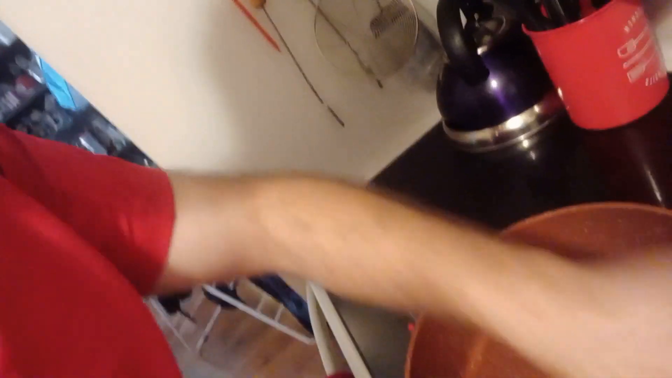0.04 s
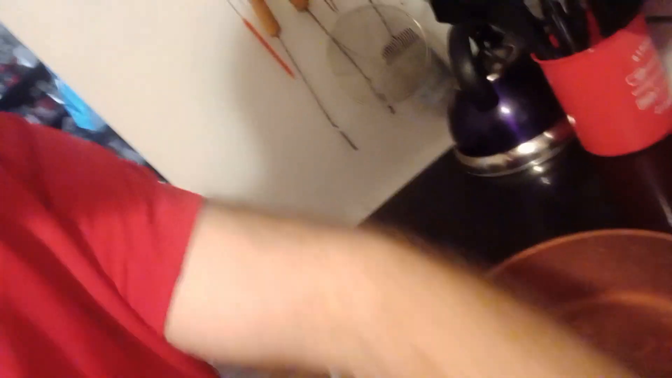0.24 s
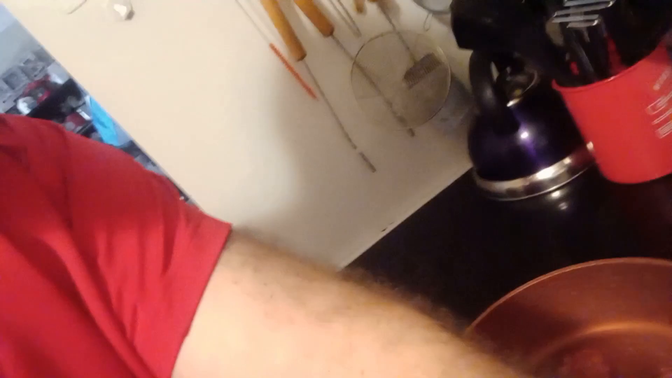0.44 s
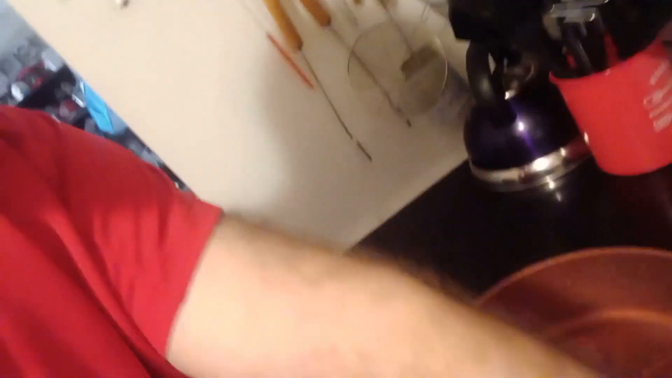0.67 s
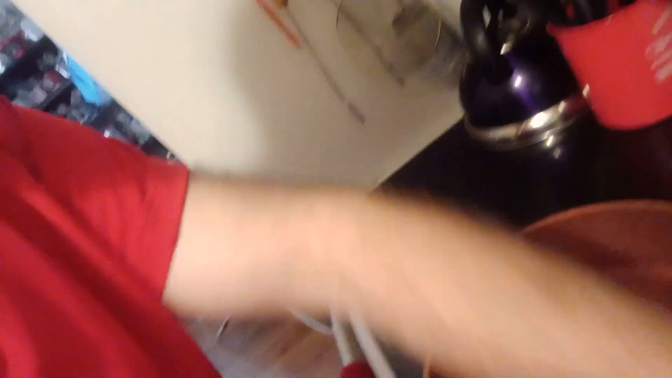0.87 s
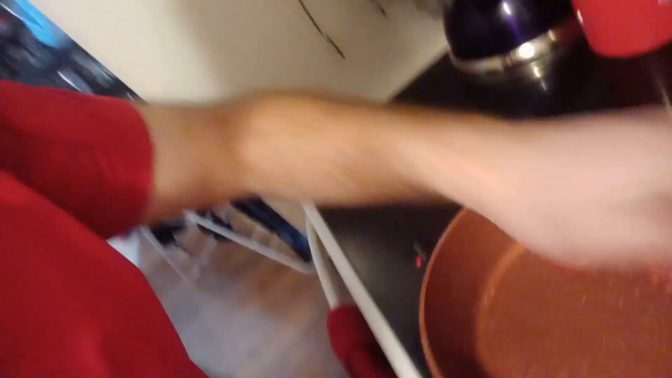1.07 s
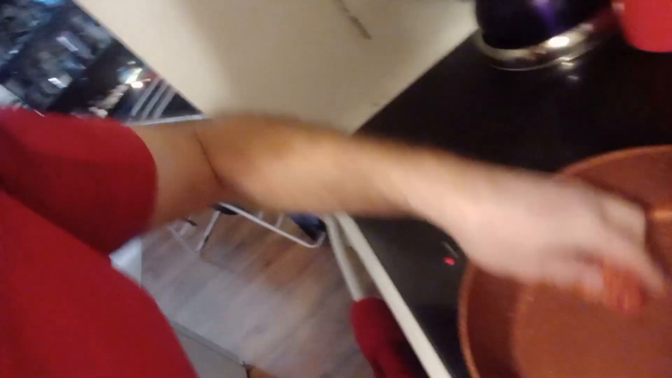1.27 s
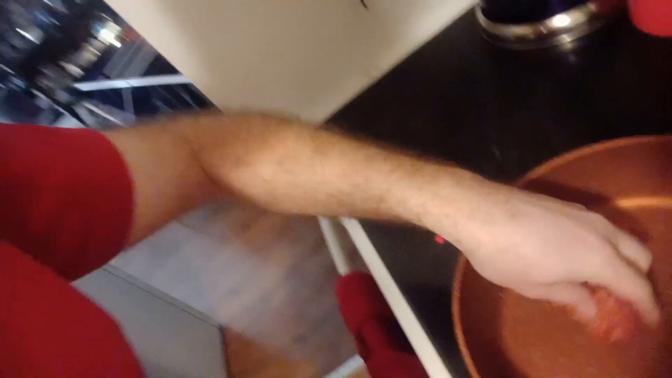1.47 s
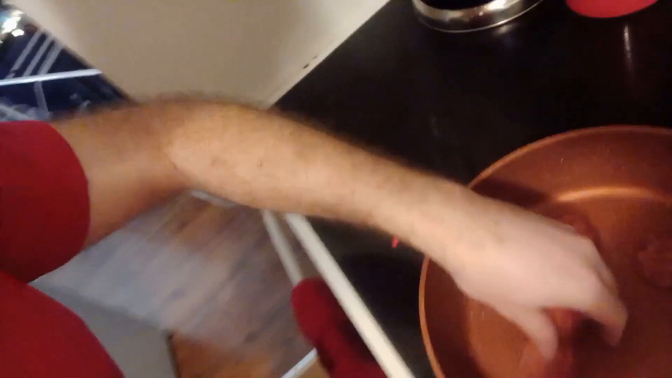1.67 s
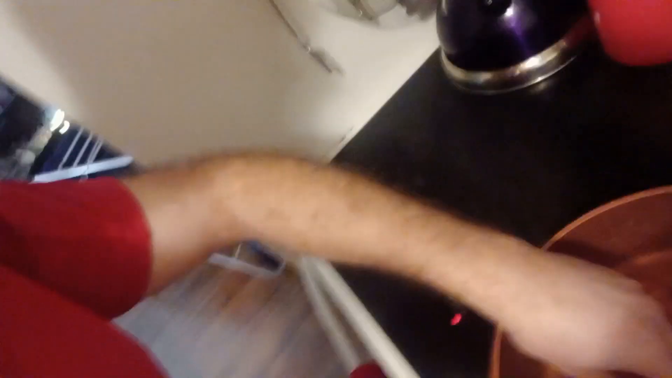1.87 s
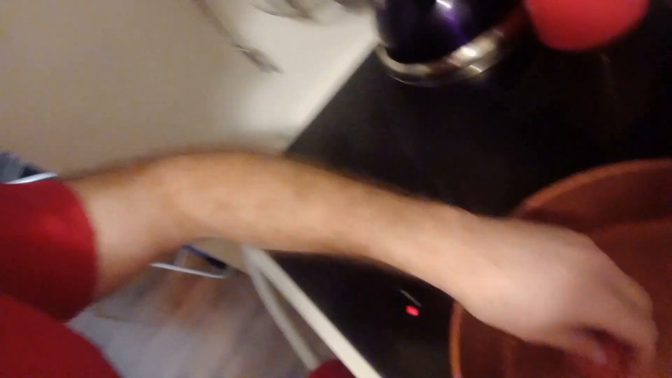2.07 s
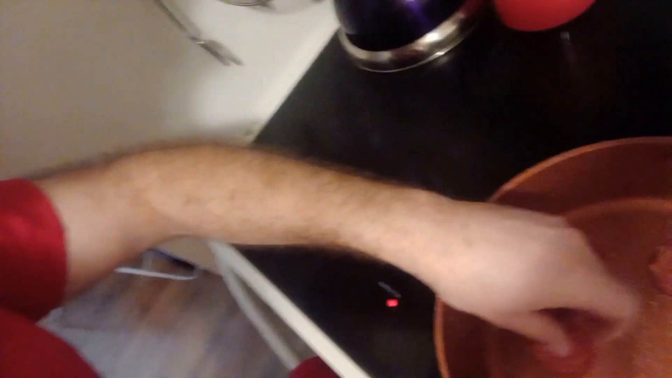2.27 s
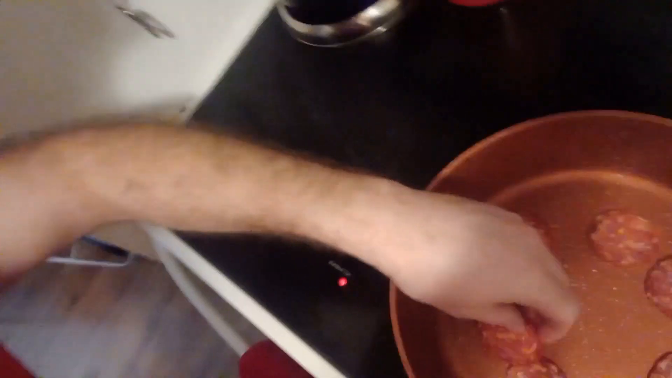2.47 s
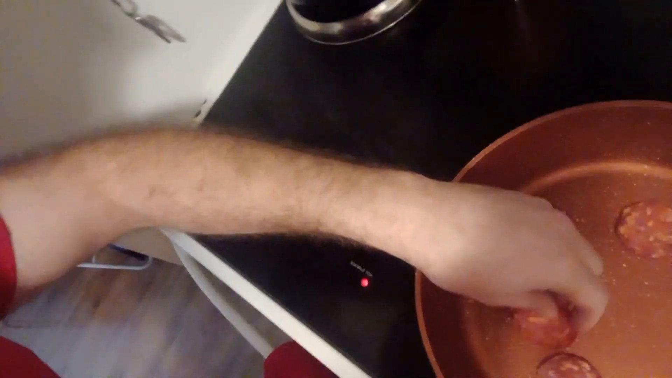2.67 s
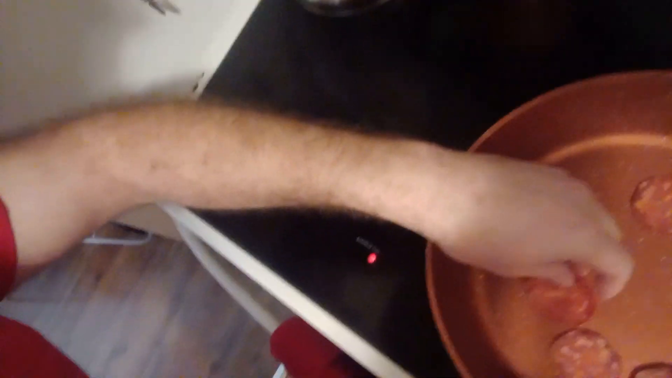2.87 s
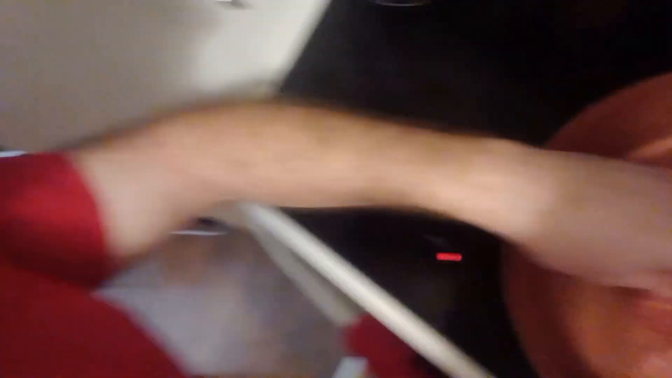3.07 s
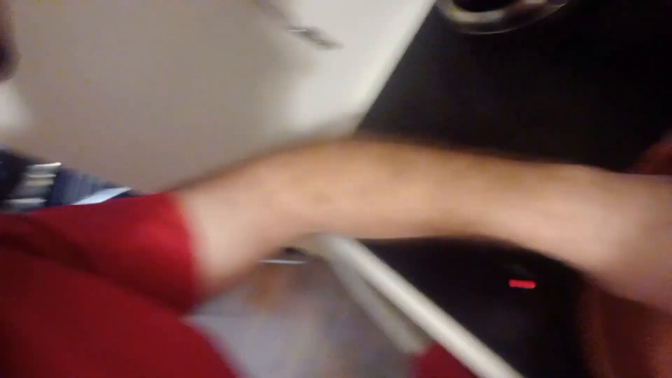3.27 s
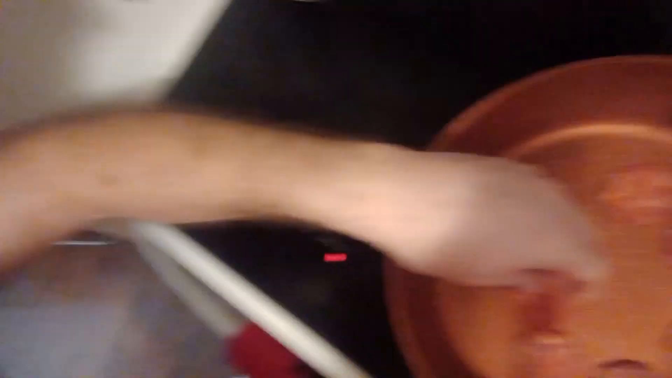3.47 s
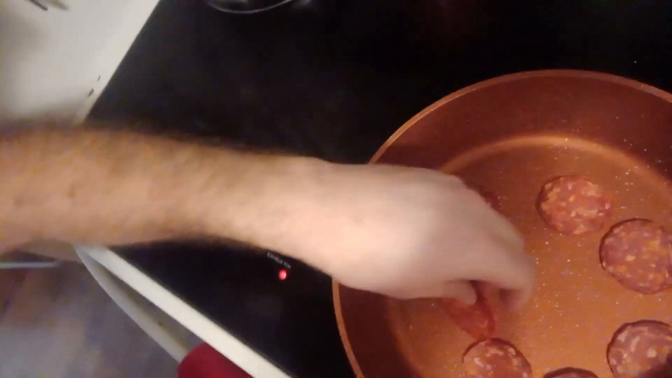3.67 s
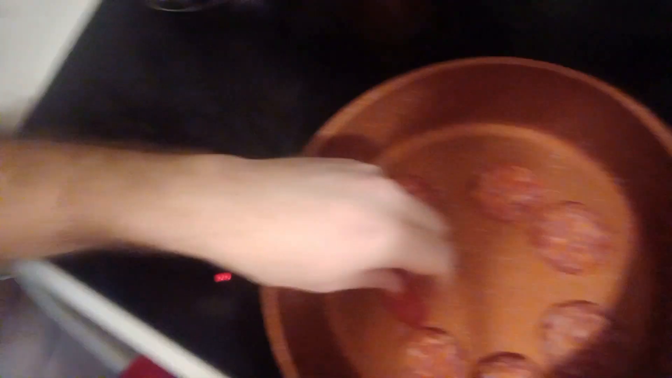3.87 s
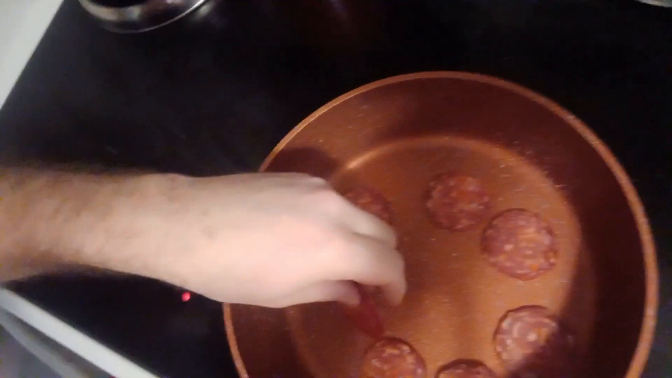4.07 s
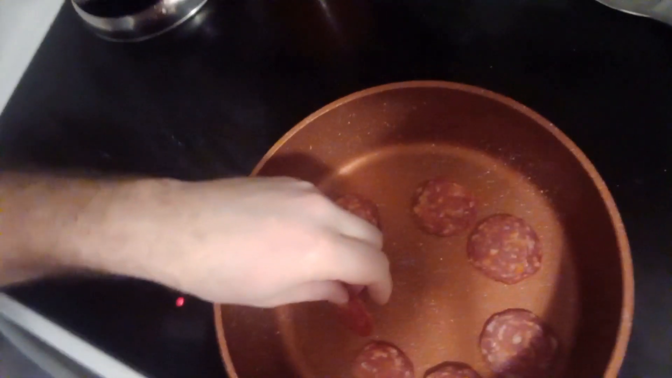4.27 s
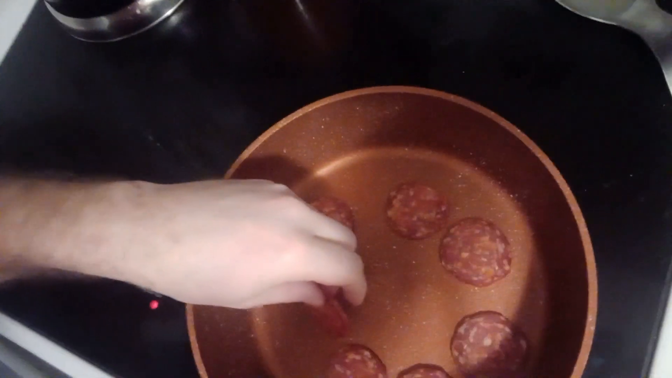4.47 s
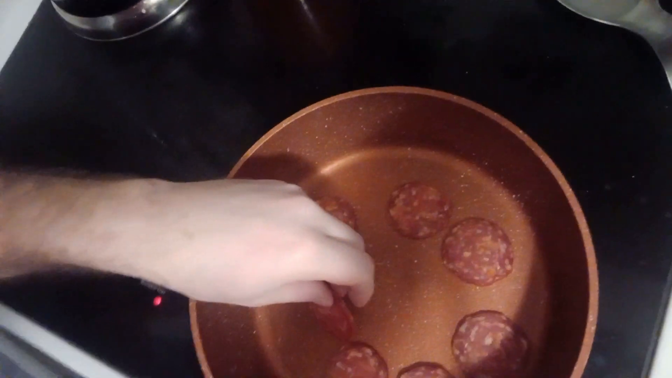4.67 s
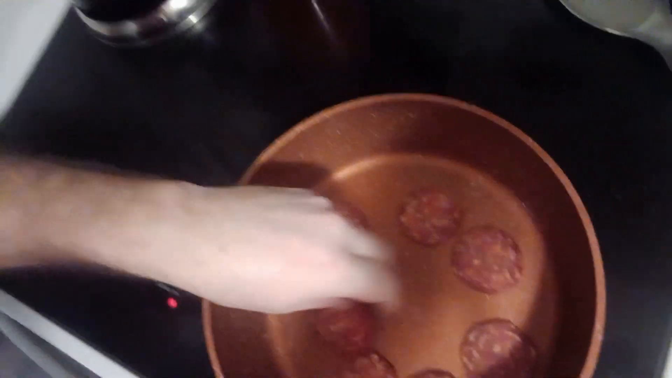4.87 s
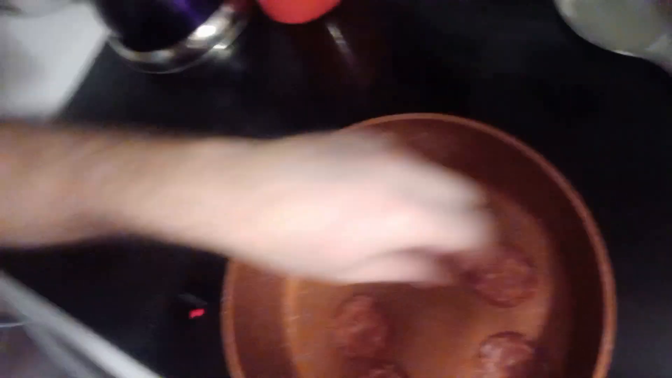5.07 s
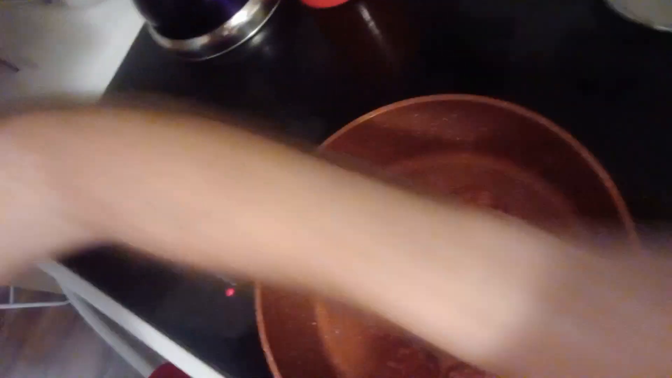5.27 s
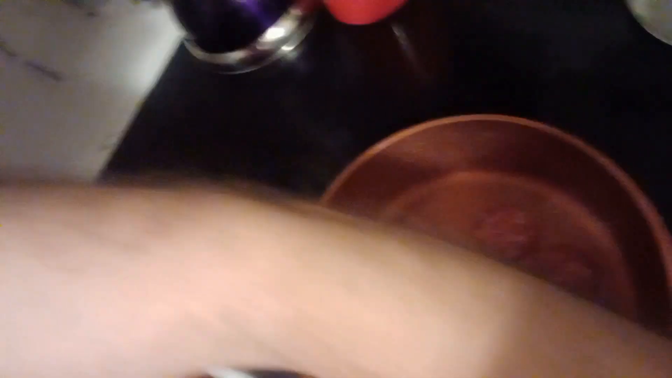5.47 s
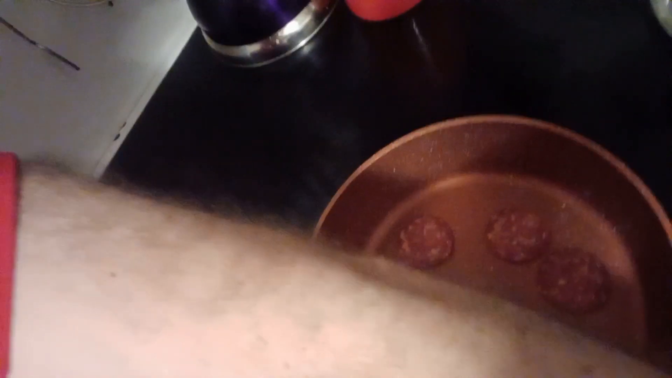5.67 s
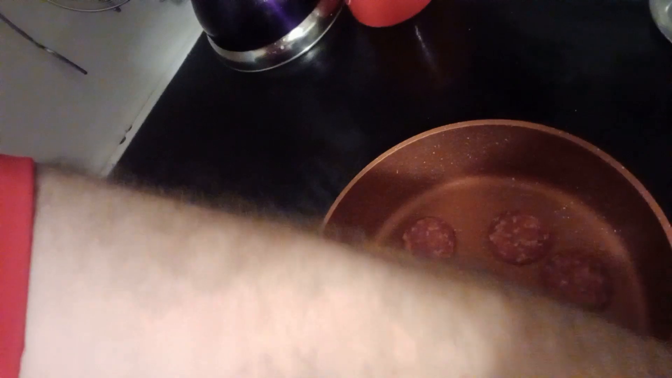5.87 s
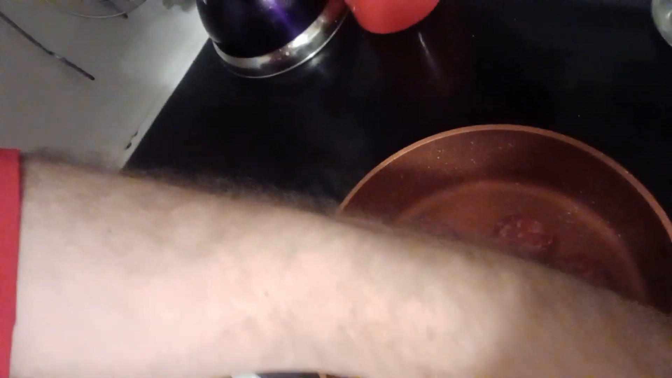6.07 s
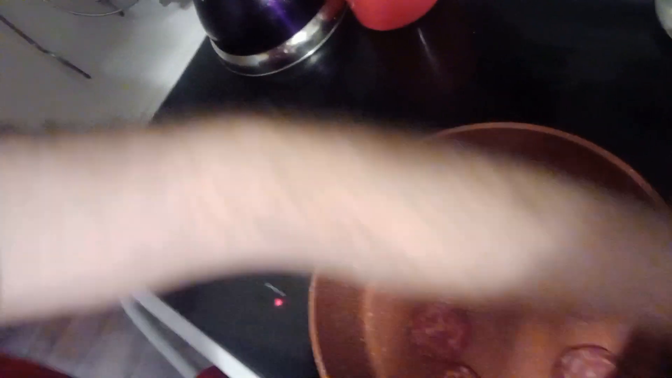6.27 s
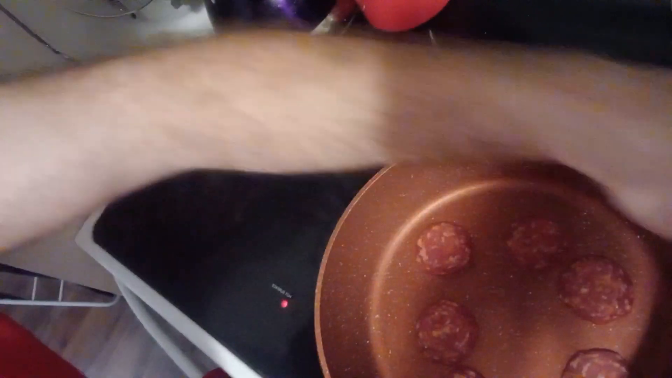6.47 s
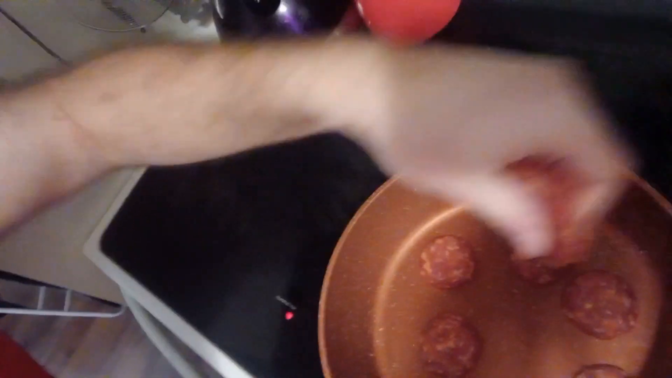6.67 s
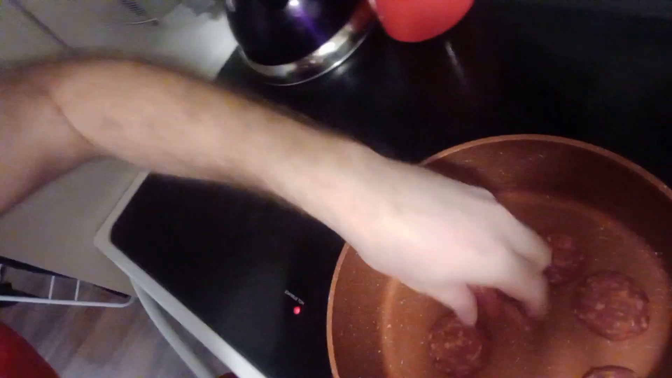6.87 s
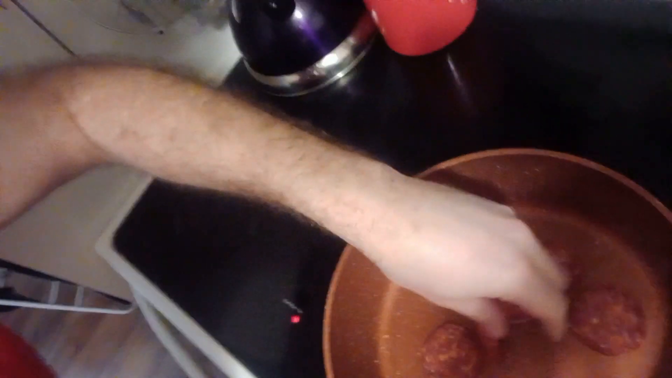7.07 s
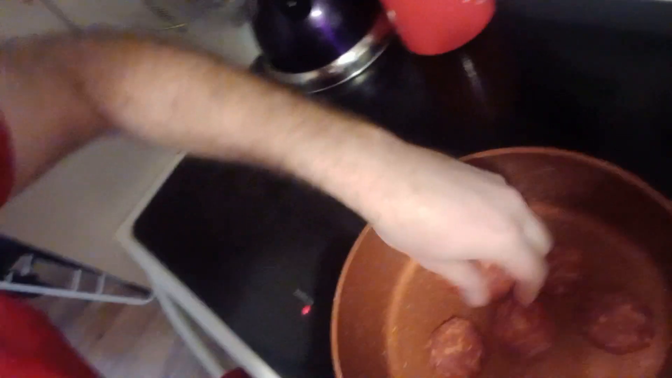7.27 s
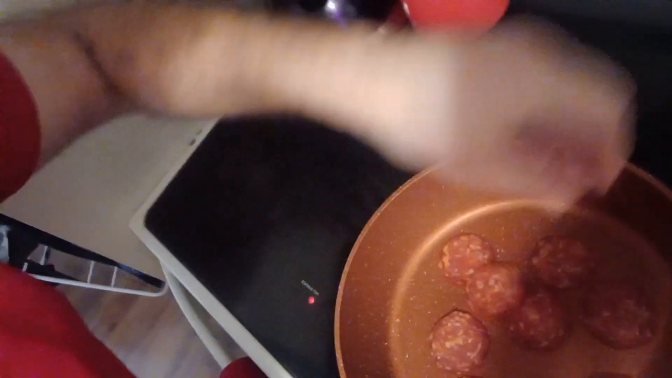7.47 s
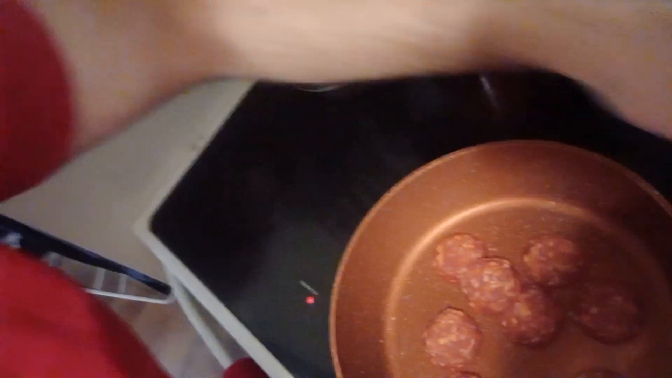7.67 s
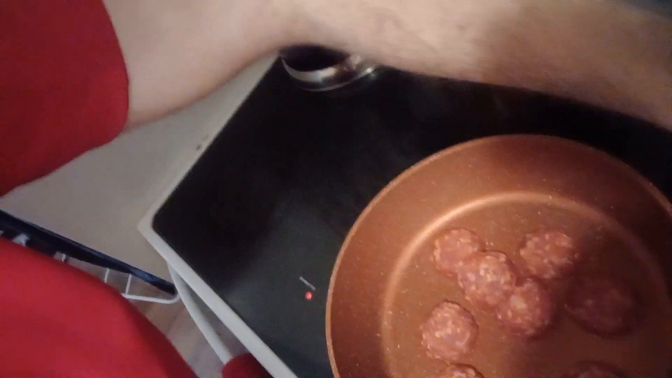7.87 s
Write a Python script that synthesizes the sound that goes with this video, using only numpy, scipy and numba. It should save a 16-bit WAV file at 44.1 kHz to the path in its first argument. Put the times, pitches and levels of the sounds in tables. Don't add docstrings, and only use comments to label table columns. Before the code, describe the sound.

Cured meat slices laid into a hot pan; a thin crackling sizzle steadily thickens with sharp spits and soft knocks over a low fridge hum.

```python
import sys
import numpy as np
from scipy import signal
from scipy.fft import rfft, irfft
from scipy.io import wavfile
from scipy.ndimage import uniform_filter1d
from numba import njit

SR = 44100
rng = np.random.default_rng(int(sys.argv[2]) if len(sys.argv) > 2 else 0)


def decibels_to_gain(level_db):
    exponent = np.asarray(level_db, float) / 20
    return 10 ** exponent


def pcm_store(signal):
    levels = np.round(np.clip(np.atleast_2d(signal), -1, 1) * 32767)
    wavfile.write(sys.argv[1], SR, levels.astype(np.int16).T)


N = 349713
TIME = np.arange(N) / SR
HZ = np.fft.rfftfreq(N, 1 / SR)


def level(x, db):
    return x * decibels_to_gain(db) / np.sqrt(np.mean(x ** 2))


def curve(table):
    s, *columns = np.transpose(table)
    return [np.interp(TIME, s, column) for column in columns]


def colour(x, points):
    hz, db = np.transpose(points)
    gain = decibels_to_gain(np.interp(np.log(HZ + 1), np.log(hz), db))
    return irfft(rfft(x) * gain, N)


def band(x, lo_hz, hi_hz):
    return signal.sosfilt(signal.butter(3, [lo_hz, hi_hz], "band", fs=SR, output="sos"), x)


def walk(rate):
    hold = int(SR / rate)
    held = np.repeat(rng.standard_normal(N // hold + 1), hold)
    return 0.478 * uniform_filter1d(uniform_filter1d(held, hold), hold)[:N]


def echoes(x, t60, db):
    t = np.arange(SR // 4) / SR
    mid, side = rng.standard_normal((2, len(t))) * decibels_to_gain(-60 * t / t60) * (t > .0008)
    side = signal.sosfilt(signal.butter(2, 300, "high", fs=SR, output="sos"), side)
    tail = np.array([mid + side, mid - side])
    tail = tail * decibels_to_gain(db) / np.sqrt(np.sum(tail ** 2, axis=1, keepdims=True))
    return x + signal.oaconvolve(x, tail, axes=1)[:, :N]


def ears(pan_db):
    return decibels_to_gain(np.array([pan_db, -pan_db]) / 2)


@njit
def rings(start, hz, t60, size, length):
    out = np.zeros(length)
    for k in range(len(start)):
        turn = np.exp(2j * np.pi * hz[k] / SR - np.log(1000) / (t60[k] * SR))
        z = size[k] + 0j
        for i in range(start[k], min(length, start[k] + int(t60[k] * SR))):
            out[i] += z.imag
            z *= turn
    return out


def at_ears(s, hz, t60, size, pan_db, lag_s):
    heard = []
    for side, gain in zip((1, -1), ears(pan_db)):
        start = np.clip((s + side * lag_s / 2) * SR, 0, N).astype(np.int64)
        heard.append(rings(start, hz, t60, size * gain, N))
    return np.array(heard)


def bursts(s, hz, t60, size, pan_db, lag_s, tail_s, tail_db, count):
    rows = np.broadcast_arrays(s, hz, t60, size, pan_db, lag_s)
    places = [[1. * row[k::count] for row in rows] for k in range(count)]
    return sum(echoes(at_ears(*place), tail_s, tail_db) for place in places)


WALLS_S = 0.057

# pitch_hz [Hz], level_db [dB]
LEFT_EAR = [(1200, -33.5), (1900, -25), (2600, -35.5), (2900, -16.5), (4600, -11.5), (6200, -9),
            (8000, -7.5), (9000, -10), (9800, -32), (11000, -3.5), (13000, 2.5), (14700, 6.5),
            (15750, 10.5), (16000, -59)]
RIGHT_EAR = [(1200, -37.5), (1900, -32), (2600, -29.5), (2900, -23.5), (5000, -16), (6700, -10),
             (7300, -11.5), (8400, -23), (9400, -15), (10500, -7), (12000, -1), (13500, 5), (15750, -5),
             (16000, -55)]


def microphones(x):
    x = np.array([colour(x[0], LEFT_EAR), colour(x[1], RIGHT_EAR)])
    low = irfft(rfft(x) / (1 + (HZ / 9000) ** 12), N)
    return x - low, low


# start_s [s], fizz_db [dB], left_minus_right_db [dB]
FRYING = [(0.0, -54, -7), (0.26, -52.5, -9.5), (0.5, -47.5, -8), (1.04, -46.5, -10.5), (1.17, -40.5, -7.5),
          (1.45, -39.5, -8.5), (1.7, -38, -9), (2.25, -36, -10), (2.65, -36, -8), (2.98, -35, -10),
          (3.35, -33, -10), (3.7, -35, -7), (4.37, -35.5, -4.5), (5.15, -33.5, -5.5), (5.32, -36.5, -4.5),
          (5.6, -34.5, -6), (6.87, -33.5, -6), (7.93, -32.5, -6)]


def sizzle():
    when, pitch, strength, place, delay = rng.random((40000, 5)).T
    s = when * N / SR
    hz = 1500 + 18000 * pitch
    flurry_db = 4 * walk(12) + 4.8 * walk(90)
    bubble_db = np.minimum(-4.0 * np.log(strength), 17)
    size = decibels_to_gain(bubble_db + flurry_db[(s * SR).astype(int)]) * np.sqrt(hz)
    lag_s = .0002 + .0006 * (delay - .5)
    bubbles = bursts(s, hz, 5.6 / hz, size, 8 * (place - .5), lag_s, WALLS_S, -2.5, count=6)
    finest = rng.standard_normal((2, N)) * decibels_to_gain(0.059 * flurry_db)
    fizz_db, pan_db = curve(FRYING)
    hiss_db = -10.5 + 0.56 * (pan_db - pan_db.mean()) + 0.04 * (fizz_db - fizz_db.mean())
    bright, low = microphones(level(bubbles, 0) + level(finest, 0.74))
    fizz = level(bright, 0.25) + level(low, 0.15) * decibels_to_gain(hiss_db)
    return ears(pan_db) * decibels_to_gain(fizz_db) * fizz


# start_s [s], peak_db [dB], lower_hiss_db [dB], left_minus_right_db [dB]
SPITS = [(0.6335, -24, -0.5, -10), (0.7314, -29, 3, -12), (0.7622, -27, -28, -10), (0.908, -26, -33, -10),
         (1.4555, -21, -5, -14), (1.4948, -20, 0, -6), (1.6505, -25, -25, -9), (2.04, -19.5, 0, -9),
         (2.324, -13.5, -13, -8), (2.4453, -16, -22, -6.5), (2.6275, -16.5, -28, -18),
         (2.803, -17, -4, -13), (3.2894, -17, 2, -15), (3.511, -17, -16, -12), (3.8312, -20, -12, -12),
         (4.0732, -15.5, -11, -19), (4.2442, -13, -21, -2.5), (4.4206, -18, -3, -4), (5.033, -15, -23, -6),
         (5.3742, -14.5, -25, -3), (5.4944, -21, -28, -5), (5.6401, -19, -31, -11), (6.355, -5, -32, -9),
         (6.5585, -9.5, -8, -2), (6.7713, -9, -27, -6), (6.8507, -9.5, -22, -5), (7.167, -9.5, -22, 3),
         (7.47, -8, -28, -2.0), (7.634, -13.5, -28, -5), (7.6926, -12, -20, -5)]
# start_s [s], peak_db [dB]
SPATTER = [(0.0014, -26.5), (0.1428, -26), (0.1635, -34), (0.1869, -30), (0.3994, -30), (0.4154, -33),
           (0.427, -31), (0.6401, -30), (0.7266, -28), (0.9131, -27), (0.9518, -34), (1.3301, -29),
           (1.3902, -28), (1.3981, -25), (1.9669, -18), (2.3893, -25), (2.4835, -20), (2.6886, -16),
           (2.7056, -17), (2.8141, -13), (2.9971, -18), (3.1196, -16), (3.1378, -22), (3.373, -9),
           (3.425, -23), (3.4919, -19), (3.5698, -16), (3.6083, -21), (3.7619, -17), (3.8415, -16),
           (3.9233, -19), (4.0285, -24), (4.2671, -15), (4.3381, -20), (4.3646, -19), (4.4302, -18),
           (4.4433, -23), (5.0688, -12), (5.3344, -20), (5.3804, -12), (5.6522, -15), (5.687, -10),
           (5.8266, -11), (5.9053, -19), (5.9603, -13), (6.9296, -14), (6.9578, -19), (7.0825, -8),
           (7.1, -8), (7.1281, -9), (7.1746, -15), (7.2393, -12), (7.3283, -15), (7.3527, -15),
           (7.3792, -9.5), (7.7028, -8), (7.7356, -10), (7.7483, -13), (7.8405, -14), (7.8913, -12)]
# start_s [s], peak_db [dB]
POPS = [(0.4016, -33), (0.552, -33), (0.7631, -37), (1.204, -37), (1.2095, -29), (1.457, -25),
        (1.5355, -29), (1.6505, -26), (2.042, -31), (2.052, -26), (2.326, -31), (2.3897, -26),
        (2.4466, -22), (2.628, -25), (2.794, -21), (2.8033, -30), (2.909, -23), (2.988, -25), (3.0357, -14),
        (3.077, -17), (3.1376, -18.5), (3.156, -21), (3.2037, -22), (3.268, -21), (3.2848, -17.5),
        (3.3216, -25), (3.3772, -12), (3.3827, -25), (3.4592, -18.5), (3.7971, -25), (3.8203, -21),
        (3.833, -19), (3.9234, -23), (4.074, -19.5), (4.245, -18.5), (4.422, -18), (4.7527, -23),
        (4.9602, -16), (5.0337, -27), (5.0692, -24), (5.2627, -27), (5.335, -25), (5.3757, -21),
        (5.7826, -18.5), (6.357, -14), (6.4872, -23), (6.561, -21), (6.8506, -14.5), (6.8572, -25),
        (6.9481, -25), (7.1282, -12.5), (7.1672, -21), (7.2392, -31), (7.2913, -27), (7.6458, -29),
        (7.697, -22), (7.7014, -24), (7.749, -26), (7.772, -26), (7.8412, -25)]


def spits():
    turn_s, _, turn_db = np.transpose(FRYING)
    small = [(s, db - 2.5, -9, np.interp(s, turn_s, turn_db)) for s, db in SPATTER]
    s, db, hiss_db, pan_db = np.transpose(SPITS + small)
    walls_db = -5
    bright = bursts(s, 9000.0, 0.00022, decibels_to_gain(db + 19.0), pan_db, .0002, WALLS_S, walls_db, count=3)
    low = bursts(s, 10600.0, 0.0014, decibels_to_gain(db + hiss_db + 15.5), pan_db, .0002, WALLS_S, walls_db, count=2)
    s, db = np.transpose(POPS)
    dull = bursts(s, 8300.0, 0.00031, decibels_to_gain(db + 21.0), -10.5, 0.00018, WALLS_S, walls_db + 3, count=2)
    return microphones(bright)[0] + microphones(low + dull)[1]


# start_s [s], shaft_tone_db [dB], left_minus_right_db [dB]
FRIDGE = [(0.0, -58, -10), (0.2, -57, -8), (0.44, -53, -10), (0.68, -51, -10), (1.63, -50.5, -13),
          (1.83, -48, -8), (2.12, -51, -12.5), (3.44, -57.5, -13.5), (4.11, -53.5, -11), (5.01, -46.5, -7),
          (5.46, -49.5, -10), (5.79, -43, -3), (6.29, -53.5, -15), (6.56, -50.5, -8), (6.76, -56, -12),
          (7.6, -57, -6.5), (7.73, -56, -7), (7.93, -54, -15)]
# pitch_hz [Hz], level_db [dB]
HUM = [(45.1, -60), (83.9, -62), (119.9, -52), (177.5, -70.5), (296, -77.5), (414.5, -79)]
# pitch_hz [Hz], level_db [dB per Hz]
AIR = [(18, -48), (30, -5), (122, -3), (145, -9.5), (172, -15), (247, -13.5), (347, -14), (591, -35),
       (1100, -35.5), (1390, -52), (1880, -58), (2550, -83), (2800, -48), (3640, -50.5), (6160, -120)]


def fridge():
    shaft_hz, wander_db = 59.2, 4
    shaft_db, pan_db = curve(FRIDGE)
    tones = decibels_to_gain(shaft_db + 2.0) * np.sin(2 * np.pi * shaft_hz * TIME)
    for hz, db in HUM:
        swell = decibels_to_gain(db + wander_db * walk(2.675))
        tones = tones + swell * np.sin(2 * np.pi * hz * TIME + 2 * np.pi * rng.random())
    mid, side = rng.standard_normal((2, N))
    side = irfft(rfft(side) * np.clip(HZ / 460.0, .15, 1), N)
    air = colour(np.array([mid + side, mid - side]), AIR)
    air = air * decibels_to_gain(-64.5) / np.std(band(air, 152, 910))
    return np.sqrt(2) * tones * ears(pan_db) * decibels_to_gain(-3.0) + air * ears(-3.0)[:, None]


# start_s [s], peak_db [dB], pitch_hz [Hz]
SQUEAKS = [
    (0.101, -46.5, 4230),
    (0.1156, -49, 4220),
    (0.1361, -54, 4260),
    (0.1544, -52, 4170),
    (0.399, -49, 4760),
    (3.5844, -52.5, 2300),
    (3.594, -58, 2090),
    (3.6044, -60, 2180),
]


def squeaks():
    s, db, hz = np.transpose(SQUEAKS)
    whistles = at_ears(s, hz, np.full(len(s), .03), decibels_to_gain(db - 3.0), 0 * s - 3, 0.00017)
    return echoes(whistles, t60=0.13, db=7.5)


def during(swells_db, *shares_db):
    return [np.interp(TIME, TIME[::64], decibels_to_gain(share) @ decibels_to_gain(swells_db)) for share in shares_db]


def grains():
    return rng.standard_normal((2, N)) * decibels_to_gain(7.2 * walk(40))


# middle_s [s], length_s [s], strength_db [dB], thin_share_db [dB]
RUSTLE = [(0.22, 0.35, -81.5, 8.5), (0.65, 0.11, -66.5, -3), (1.435, 0.058, -64.5, -13),
          (0.353, 0.074, -91.5, 11), (0.47, 0.14, -75, 19), (0.534, 0.091, -66.5, 0),
          (1.145, 0.071, -62.5, -6), (1.246, 0.13, -64.5, -6.5), (1.528, 0.044, -61.5, -4),
          (1.592, 0.058, -57.5, -11), (1.662, 0.042, -65, 0), (2.16, 0.069, -68, -21), (3.598, .05, -78, 5),
          (4.173, 0.22, -71, 1), (5.128, 0.25, -67.5, 3.5), (5.733, 0.094, -64, 2), (5.86, 0.094, -63, 1.5),
          (6.133, 0.17, -69, -8), (7.603, 0.076, -58.5, -6), (7.7, 0.046, -72, 14), (7.92, 0.061, -81, 19)]


def rustle():
    s, length, db, thin_db = np.transpose(RUSTLE)
    from_middle = 2 * (TIME[::64] - s[:, None]) / length[:, None]
    dull, thin = during(-5.5 * from_middle ** 2, db, db + thin_db)
    thin_noise = grains()
    cloth = dull * level(band(grains(), 460, 1260), 0.47) + thin * level(band(thin_noise, 1610, 2190), 0.32)
    cloth = cloth + thin * level(band(thin_noise, 3000, 4350), -7)
    return cloth * ears(-1.2)[:, None]


def joist(hz, waver_hz):
    return np.sqrt(2) * np.sin(2 * np.pi * np.cumsum(hz + waver_hz * walk(10)) / SR)


# start_s [s], boom_db [dB], thud_share_db [dB], creak_share_db [dB]
STEPS = [(0.428, -35.5, -0.5, -22), (0.455, -35, -3.5, -11.5), (0.478, -46, 0, -13), (0.497, -45.5, -7, -6),
         (0.517, -42, -8, -14), (0.54, -40, -14, -6), (0.567, -50, -12, -7), (0.6, -44, -11, -11),
         (0.622, -46, -8, -13), (0.7, -58, -11, -22), (5.648, -37, -15, -22), (5.665, -30.5, -14, -23),
         (5.691, -31, -12, -11), (5.704, -39.5, -11, -4), (5.728, -39, -18, -7), (5.749, -33.5, -9, -12),
         (5.785, -50, -13, -3), (5.812, -37, -5, -23), (5.848, -44, -4, -5.5), (5.865, -44, -5, -15),
         (5.885, -42, -2, -15.5), (5.91, -46, -9, -12), (5.934, -47, -11, -25), (7.425, -48, 15, -7),
         (7.46, -51, 4, 2)]
# pitch_hz [Hz], level_db [dB]
BOARDS = [(185, -3), (250, -3.5), (366, 0), (549, -9), (720, -16.5)]


def floor():
    rise_db_s, fall_db_s = 1800, 406
    s, db, thud_db, creak_db = np.transpose(STEPS)
    after = TIME[::64] - s[:, None]
    swell_db = np.where(after < 0, rise_db_s, -fall_db_s) * after
    boom, thud, creak = during(swell_db, db, db + thud_db, db + creak_db)
    beams = boom * joist(73, waver_hz=5.5) * decibels_to_gain(-2.0) + thud * joist(112, waver_hz=14.07)
    noise = grains()
    noise = noise[0] + 1.2 * noise
    boards = creak * sum(level(band(noise, 0.91 * hz, 1.106 * hz), db - 4.5) for hz, db in BOARDS)
    return (beams + boards) * ears(-5.0)[:, None]


# start_s [s], strength_db [dB], weight_on_stove_db [dB], hardness_db [dB],
# nearness_to_pan_wall_db [dB]
KNOCKS = [(1.746, -42.5, 8.5, -10, -1), (1.757, -45.5, 1, -6.5, -3), (1.768, -44, 7, -15, 3),
          (1.789, -45.5, 2, -15, -1), (3.034, -70, -8, 10, -8), (3.376, -69, -3, 6, -8),
          (4.838, -64, 20, -18, -18), (4.951, -56, 8, 9, -11), (4.959, -49.5, 7, 12, -4),
          (4.97, -52, 11, 7.5, -2), (4.984, -48.5, 5, -10, 11), (5.022, -58.5, -3, 9, -3),
          (5.034, -52, 7, -1, 5), (5.108, -66, 2, 9, -15), (6.483, -48, 0, -6, -10),
          (6.499, -23.5, -6.5, -14, -5.5), (6.508, -32, -6, -17, -1), (6.519, -39, 7, -25, -9),
          (6.531, -40, -3, -15, -3), (6.549, -41, -5, -11, -2), (6.58, -36.5, -5, -15, -4),
          (6.637, -36, -2, -4, 2), (6.645, -41, -5, -2, -4), (6.659, -48.5, 2, 0, -3),
          (6.671, -47, 6, -9, -5), (7.044, -32.5, 4, -12, 5.5), (7.052, -33, 3, -14, 5),
          (7.064, -38, -5, -18, 6), (7.073, -40.5, -5, -17, 9), (7.094, -40.5, 4, -14, -9),
          (7.118, -47, 0, -10, -5), (7.289, -52, -4, 9, 2), (7.298, -53.5, 4, 3, 7),
          (7.317, -52.5, 4, -14, 11), (7.376, -52.5, 5, 6.5, -4), (7.419, -49, 9.5, 4, 4),
          (7.45, -53.5, 6, 3, 3), (7.5, -47.5, -5, 5, 3), (7.591, -55.5, 10, 3.5, 2),
          (7.63, -57, 2, -4, -1)]
# pitch_hz [Hz], level_db [dB], t60_s [s]
STOVE = [(126, 1.5, 0.096), (156.5, 2, 0.1), (194, -5, 0.044)]
PAN_LOW = [(250, -3, 0.1), (315, -1, 0.096), (390, -2.5, 0.06), (435, -4, 0.086)]
PAN_WALL = [(542, -7.5, 0.052), (613, -11, 0.1), (680, -2, 0.059)]
PAN_HIGH = [(1118, -3, 0.057), (1247, -1, 0.049), (1480, -6, 0.022), (1760, -4, 0.025), (1910, -11, 0.03)]


def knocks():
    contacts = 2
    s, low_db, weight_db, hard_db, edge_db = np.repeat(KNOCKS, contacts, axis=0).T
    count = len(s)
    thud_db = low_db + weight_db
    wall_db = low_db - 4 + 0.35 * hard_db + edge_db
    ring_db = low_db - 2.5 + hard_db
    crack_db = low_db + 4.5 + hard_db
    late = rng.random(count) * (np.arange(count) % contacts > 0)
    s, fade_db, pan_db = s + .02 * late, -20 * late, np.full(count, -3.5)
    parts = ((STOVE, thud_db - 5.0), (PAN_LOW, low_db - 7.0), (PAN_WALL, wall_db + 2.5),
             (PAN_HIGH, ring_db + 6.5))
    out = 0
    for modes, db in parts:
        for hz, mode_db, t60 in modes:
            chance = rng.standard_normal((count, 4)).T
            size = decibels_to_gain(db + mode_db + fade_db + 1.5 * chance[0]) * np.sign(chance[1])
            pitch_hz = hz * (1 + 0.016 * chance[2])
            start = s + 0.001515 * np.abs(chance[3])
            out = out + at_ears(start, pitch_hz, np.full(count, t60), size, pan_db, 0.00019)
    push = np.hanning(SR // 2200)[None]
    out = signal.oaconvolve(out, push / push.sum() * decibels_to_gain(-0.5), axes=1)[:, :N]
    short_s = np.full(count, .003)
    slap_size = decibels_to_gain((wall_db + ring_db) / 2 + fade_db + 3.5)
    slap = at_ears(s, np.full(count, 900.), short_s, slap_size, pan_db, 0.00089)
    crack_hz = 1800 + 1900 * rng.random(count)
    crack = at_ears(s, crack_hz, short_s, decibels_to_gain(crack_db + fade_db + 12.5), pan_db, 0.00021)
    room_s = 0.29
    return echoes(out, room_s, db=-5) + echoes(slap, room_s, db=9) + echoes(crack, room_s, db=-2.0)


def scene():
    return sizzle() + spits() + fridge() + squeaks() + rustle() + floor() + knocks()


def top_cut(x):
    return signal.sosfilt(signal.butter(12, 17020, fs=SR, output="sos"), x)


def record(dry):
    headroom = .9
    rumble_cut = signal.butter(3, 38, "high", fs=SR, output="sos")
    rounded = headroom * np.tanh(signal.sosfilt(rumble_cut, dry) / headroom)
    return top_cut(rounded)


dry = scene()
out = record(dry)
pcm_store(out)
```